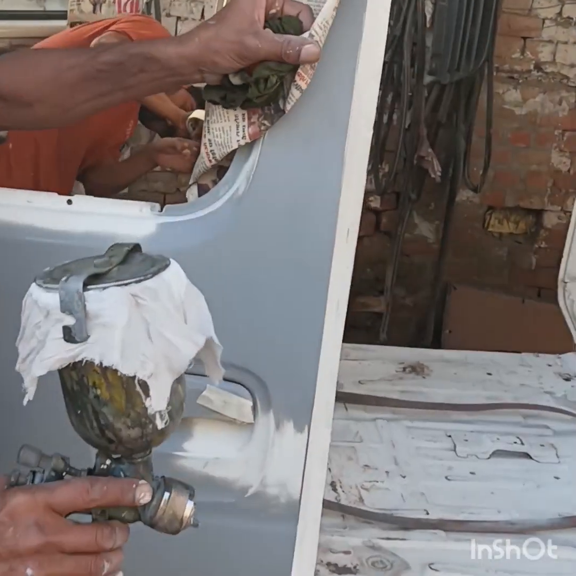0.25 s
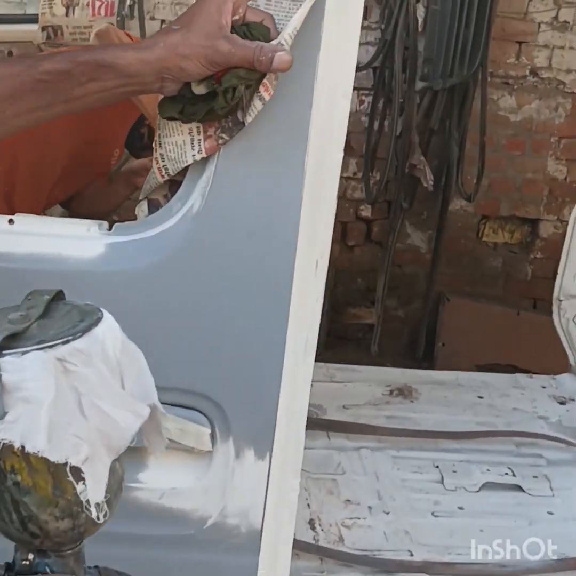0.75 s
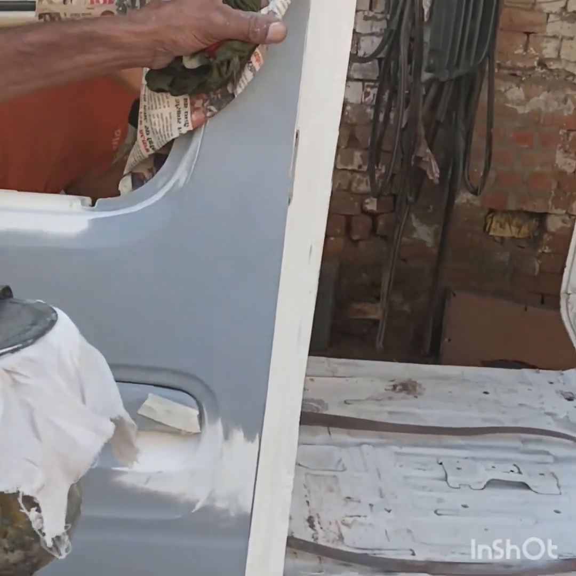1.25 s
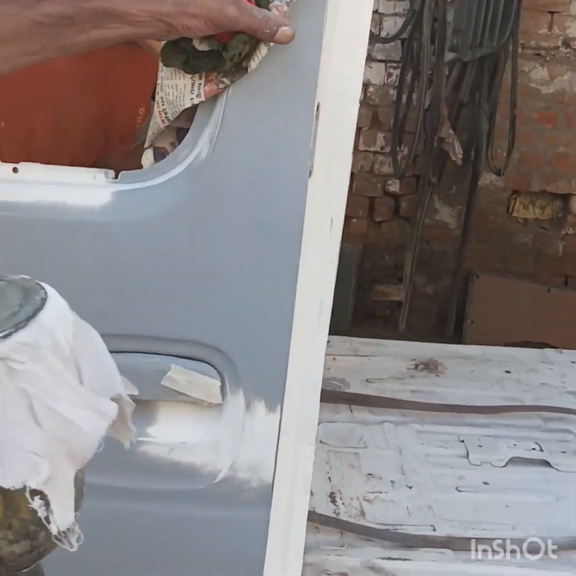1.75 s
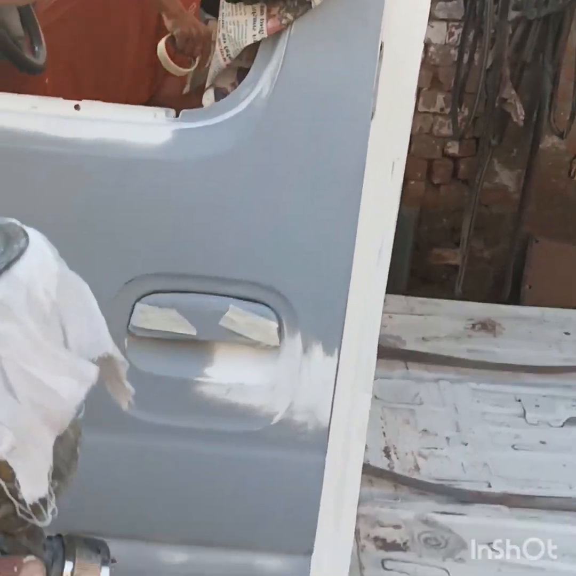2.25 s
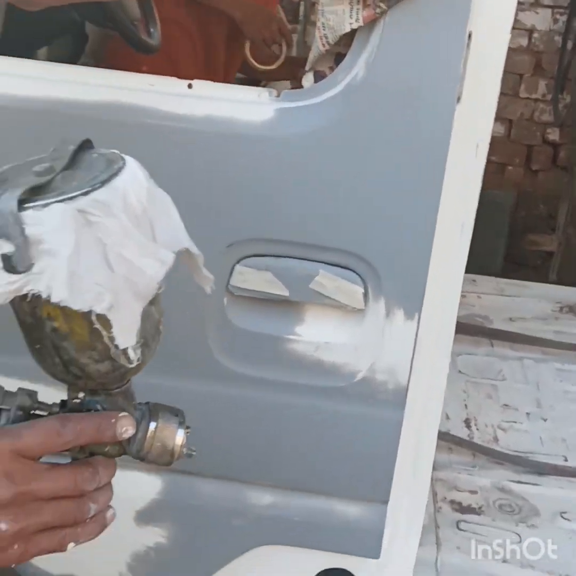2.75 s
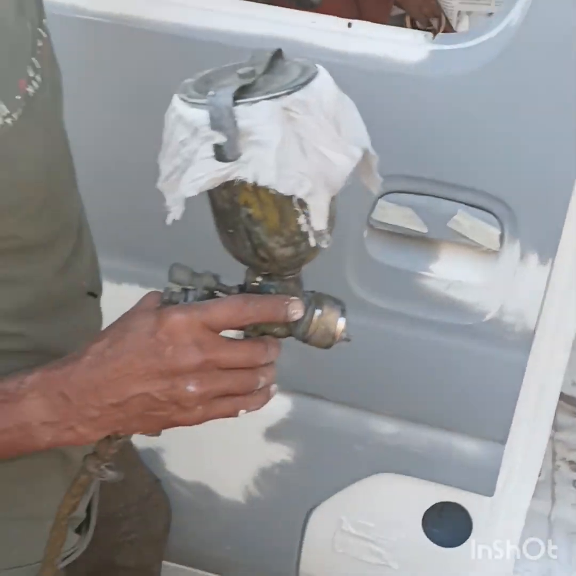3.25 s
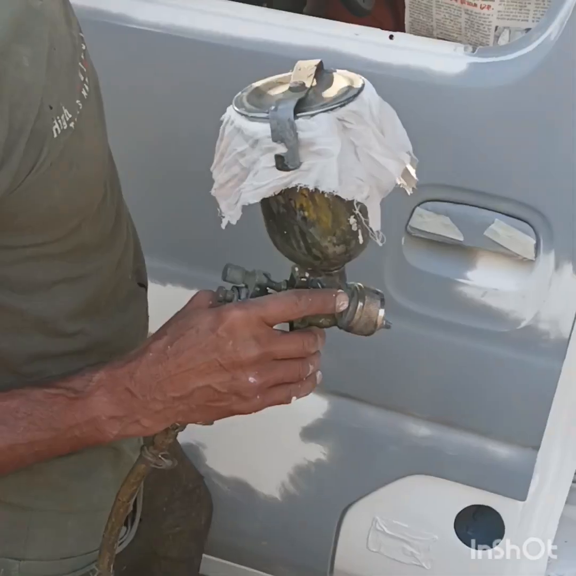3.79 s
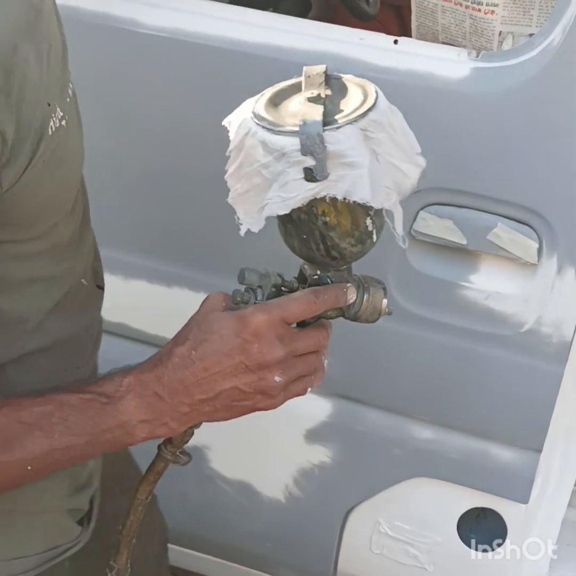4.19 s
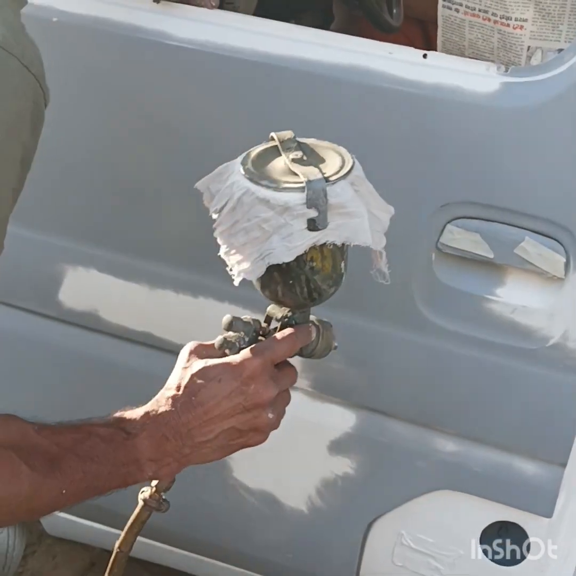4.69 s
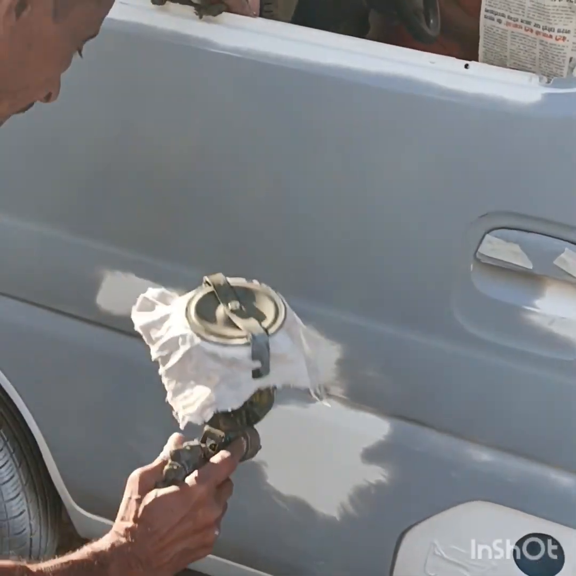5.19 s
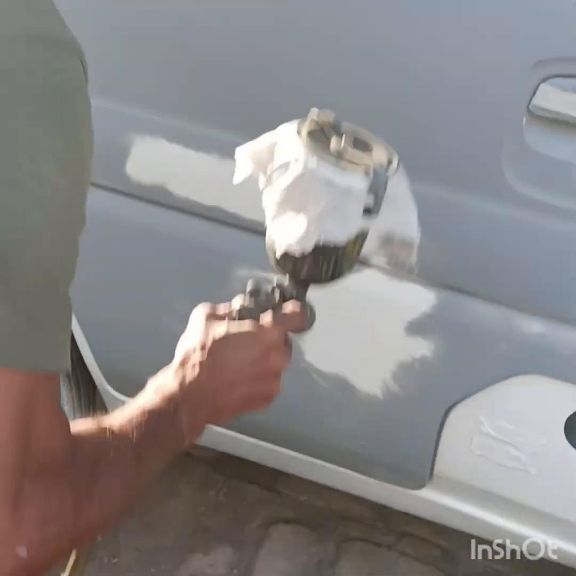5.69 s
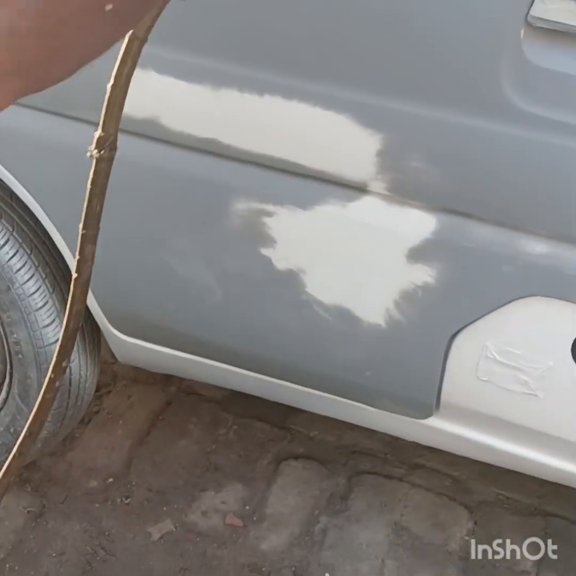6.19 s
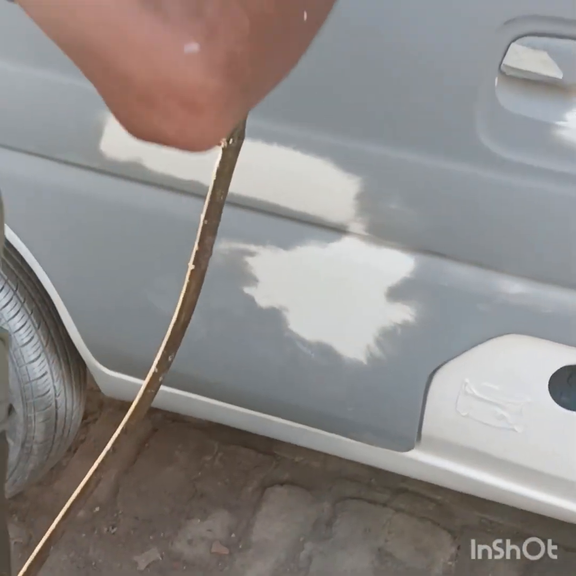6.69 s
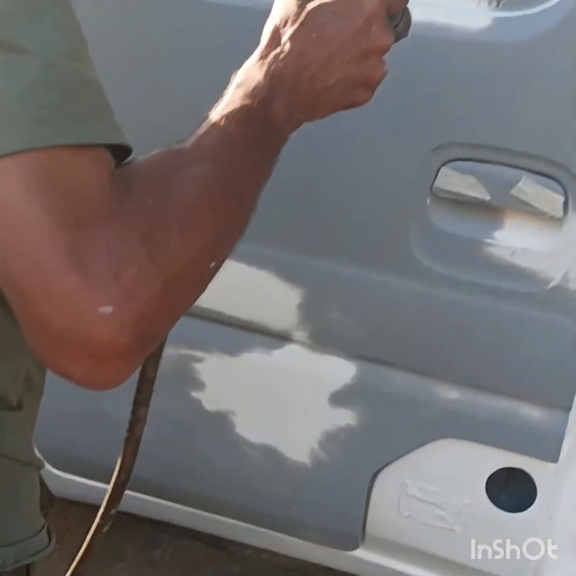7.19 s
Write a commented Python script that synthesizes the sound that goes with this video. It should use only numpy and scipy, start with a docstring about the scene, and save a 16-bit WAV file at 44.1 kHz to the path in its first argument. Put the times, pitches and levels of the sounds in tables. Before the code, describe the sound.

In an open yard, a one-cylinder air compressor chugs without pause, about seven short, low, hollow whoops a second, each with a faint metallic valve clack. A bright, airy spray-gun hiss runs throughout, changing colour and leaning left or right as the gun moves. Faint metal hums come and go; a tiny hoot and a thin whistle pass midway. Stereo microphone close by, compressor stronger on the left, low rumble behind.

```python
"""A one-cylinder piston compressor chugs in an open yard while air hisses from a spray gun near a car door.
Each turn, a sine rising in pitch makes the intake's short hollow whoop, with noise for its rasp and push;
clicks through ringing modes make the discharge valve clack and bounce. The hiss is banded noise whose colour
and stereo lean follow curves, with a nozzle tone; narrow noise swells briefly near 15 kHz. Wavering sines and
narrow noise make faint metal hums, one thin whistle and one soft hoot; banded noise makes the yard floor."""
import sys
import numpy as np
from scipy import signal
from scipy.fft import rfft, irfft
from scipy.io import wavfile
from scipy.ndimage import map_coordinates

SR = 44100
rng = np.random.default_rng(int(sys.argv[2]) if len(sys.argv) > 2 else 0)


def put_to_file(sound):
    """Save the sound as 16-bit audio at rate SR, in the file named by the first command-line argument."""
    columns = np.atleast_2d(sound).T  # one column per channel
    safe = np.clip(columns, -1, 1)
    whole_steps = np.round(safe * 32767)
    wavfile.write(sys.argv[1], SR, whole_steps.astype(np.int16))


N = 328104
TIME = np.arange(N) / SR
HZ = np.maximum(np.arange(N // 2 + 1) * SR / N, 1)

# crank turns, levels relative within the compressor:
# discharge valve/dB, intake whoop peak/dB, rasp/dB, guard shake/dB
TURNS = [(-44, -31, -52, -53), (-53, -31.5, -48, -61), (-44, -27, -51, -61), (-49, -30.5, -53, -66),
         (-46, -31.5, -50, -68), (-45, -31, -48, -64), (-46, -30, -51, -62), (-43, -32.5, -52, -63),
         (-53, -27.5, -57, -64), (-44, -27.5, -51, -56), (-49, -31, -54, -62), (-49, -33.5, -54, -54),
         (-47, -29, -50, -66), (-47, -32, -48, -53), (-47, -26, -52, -62), (-51, -34, -55, -66),
         (-51, -30, -54, -64), (-48, -32, -48, -58), (-48, -29, -51, -60), (-47, -33, -52, -60),
         (-55, -30.5, -55, -52), (-48, -30, -56, -59), (-48, -30.5, -55, -71), (-48, -33.5, -58, -54),
         (-50, -30.5, -55, -62), (-51, -31.5, -54, -66), (-50, -28.5, -56, -60), (-49, -30, -51, -58),
         (-51, -29.5, -57, -68), (-47, -32, -51, -62), (-49, -30.5, -59, -61), (-47, -28.5, -49, -61),
         (-50, -29.5, -58, -61), (-42, -24, -46, -53), (-44, -30.5, -51, -74), (-51, -31, -52, -61),
         (-48, -28.5, -54, -61), (-48, -28.5, -55, -67), (-47, -32.5, -55, -69), (-48, -28, -50, -46),
         (-52, -27.5, -55, -60), (-53, -25, -52, -71), (-51, -31, -58, -72), (-54, -24.5, -50, -67),
         (-53, -31.5, -57, -66), (-50, -29.5, -56, -73), (-53, -29.5, -58, -74), (-50, -31, -63, -69),
         (-45, -28, -50, -61), (-48, -30.5, -57, -53), (-49, -28, -53, -64), (-47, -27.5, -46, -52),
         (-48, -32, -54, -58), (-51, -32, -57, -62), (-47, -30, -53, -62)]
FIRST_VALVE_S, TURN_S = .009, .13722
VALVE_S = FIRST_VALVE_S + TURN_S * np.arange(len(TURNS))


def from_db(db):
    """Amplitude ratio of a level in dB."""
    return 10 ** (np.asarray(db) / 20)


def rms_one(x):
    """Scale to rms 1 over all samples and channels."""
    return x / np.sqrt(np.mean(x ** 2) + 1e-20)


def in_time(rows):
    """Columns of a curve table at every sample."""
    t_s, *columns = np.transpose(rows)
    return [np.interp(TIME, t_s, c) for c in columns]


def at_hz(rows, hz):
    """Columns of a spectrum table at the given frequencies, interpolated over log f."""
    f_hz, *columns = np.transpose(rows)
    return [np.interp(np.log(hz), np.log(f_hz), c) for c in columns]


def drift(rate_hz):
    """Slow random signal, rms 1: noise at SR / 40 through a double pole."""
    r = np.exp(-80 * np.pi * rate_hz / SR)
    noise = rng.standard_normal(N // 40 + 2002)
    slow = signal.lfilter([1], [1, -2 * r, r * r], noise)[2000:]   # drop the start-up
    return np.interp(np.arange(N) / 40, np.arange(len(slow)), rms_one(slow))


def resonance(x, hz, width_hz):
    """Two-pole resonance, gain 1 on top."""
    r = np.exp(-np.pi * width_hz / SR)
    poles = [1, -2 * r * np.cos(2 * np.pi * hz / SR), r * r]
    return signal.lfilter(np.array([1, 0, -1]) * (1 - r * r) / 2, poles, x)


def narrow_noise(hz, width_hz):
    """Noise twice through one resonance; rms 1."""
    once = resonance(rng.standard_normal(N), hz, width_hz)
    return rms_one(resonance(once, hz, width_hz))


def wavering(hz, wobble_hz, flutter_db, rate_hz):
    """Sine whose pitch and level drift; rms 1 at zero flutter."""
    phase = 2 * np.pi * np.cumsum(hz + wobble_hz * drift(rate_hz)) / SR
    return np.sqrt(2) * from_db(flutter_db * drift(rate_hz)) * np.sin(phase)


def swells(rows, width_s):
    """Gain: sum of Gaussian bells at (t/s, peak/dB)."""
    coarse_s = TIME[::40]
    bells = [from_db(db) * np.exp(-.5 * ((coarse_s - t) / width_s) ** 2) for t, db in rows]
    return np.interp(TIME, coarse_s, sum(bells))


def later(x, ms):
    """Delay that may change with time."""
    return map_coordinates(x, [np.arange(N) - ms * SR / 1000], order=3, mode="wrap")


def per_stroke(times_s, levels_db, shape):
    """Gain that repeats one envelope at every stroke; also each sample's stroke index."""
    handover_s = (times_s[1:] + times_s[:-1]) / 2 + .014
    stroke = np.searchsorted(handover_s, TIME)
    t_s, shape_db = np.transpose(shape)[:2]
    envelope_db = np.interp(TIME - times_s[stroke], t_s, shape_db, -90, -90)
    return from_db(levels_db[stroke] + envelope_db), stroke


def bands(edges_hz, spectrum, patchy_db, shared):
    """Yields centre, flicker in dB and three unrelated noises (shared, left, right) for each band."""
    white = (rfft(rng.standard_normal((3, N))) * spectrum).astype(np.complex64)
    together = drift(5.8)
    for centre, above in zip(edges_hz, edges_hz[1:]):
        # overlapping slopes: powers of neighbours sum to 1
        share = np.clip(1 - abs(np.log(HZ / centre)) / np.log(above / centre), 0, 1) ** .5
        flicker_db = patchy_db * (shared * together + drift(14))
        yield centre, flicker_db, irfft(white * share.astype(np.float32), N)


def yard():
    """Motor, belt and street blend into a steady floor of partly shared banded noise."""
    # floor: f/Hz, density/dB (relative), L-R/dB, left-right likeness (0-1)
    floor_rows = [(30, -24, 3.5, .55), (60, -8.5, 1, 0.72), (130, -5.5, -1, 0.8), (257, -6, 4.5, 0.26),
                  (365, -9, 0, 0.6), (770, -7, 5, 0.24), (1050, -9.5, 6, 0.16), (1290, -11.5, 16, 0.13),
                  (1530, -5.5, 5.5, 0.066), (1810, -10, 1, .15), (2200, -8.5, 6, 0.11),
                  (2970, -19, -6, 0.21), (3950, -47, -5, .15)]
    rms_db = -48
    spectrum = from_db(at_hz(floor_rows, HZ)[0]) * (HZ > 20) * (HZ < 5000)
    out = np.zeros((2, N))
    for hz, flicker_db, (both, left, right) in bands(
            np.geomspace(25, 6000, 17), spectrum, patchy_db=3.0, shared=0.31):
        pan_db, alike = at_hz(floor_rows, hz)[1:]
        alike = np.clip(alike, 0, 1)
        common = np.array([np.roll(both, 38), both])   # left lags by 38 samples
        mix = np.sqrt(alike) * common + np.sqrt(1 - alike) * np.array([left, right])
        out += from_db(flicker_db) * from_db(pan_db * np.array([[.5], [-.5]])) * mix
    return from_db(rms_db) * rms_one(out)


def high_swells():
    """Short swells of very high hiss near 15 kHz: bell-gated narrow noise."""
    # swells: t/s, peak of the rms envelope/dB, L-R/dB
    swell_rows = [(.401, -50, -3.5), (.555, -52, -5.5), (.846, -48, -6), (1.433, -46, -6),
                  (3.697, -52, -3.5), (4.101, -51, -3), (4.554, -51, -3), (4.808, -52, -8),
                  (4.968, -47, -12), (5.162, -40, -9.5), (5.526, -50, -3), (6.246, -50, -.5),
                  (6.833, -45, 7), (7.135, -51, -4.5)]
    width_s = .011
    t_s, level_db, pan_db = np.transpose(swell_rows)
    left, right = (swells(zip(t_s, level_db + side * pan_db), width_s) for side in (.5, -.5))
    return np.array([left * narrow_noise(14800, 900), right * narrow_noise(15200, 900)])


def zone_blend(hz, zones_hz, curves):
    """Time curves of frequency zones, interpolated over log f to one band."""
    weights = [np.interp(np.log(hz), np.log(zones_hz), row) for row in np.eye(len(zones_hz))]
    return sum(w * c for w, c in zip(weights, curves))


def jet():
    """Turbulent air at the nozzle: noise shared by both sides, blurred by each side's own, plus an edge tone."""
    # gun movement, only swings about the mean count:
    # t/s, middle hiss level/dB, low, bright and top hiss above it/dB
    moves = [(0, -45, -6, -4.5, -11), (.6, -43, -8, -6, -9.5), (1.2, -42, -8, -6, -10.5),
             (2.5, -42.5, -7, -4.5, -9.5), (3.25, -44.5, -7.5, -4.5, -10.5), (4.3, -44, -8, -5, -8.5),
             (4.74, -41, -12, -6, -9), (4.9, -43.5, -11, -3.5, -7), (5.08, -42, -12, -4.5, -11),
             (5.37, -40, -12, -5, -9), (5.53, -42.5, -12, -1.5, -9), (5.8, -41.5, -11, -6, -8),
             (6, -43, -9, -1, -10), (6.13, -41.5, -8, -2, -10.5), (6.27, -40.5, -11, -6, -13),
             (6.46, -42.5, -9, -2.5, -12.5), (7.1, -44, -9, -2.5, -12.5), (7.44, -45, -8, -1.5, -13)]
    # centres of low, middle, bright and top hiss: f/Hz
    level_zones_hz = [4200, 6700, 10000, 15000]
    # hiss colour: f/Hz, density/dB (relative)
    colour = [(1530, -47), (2600, -13), (3050, -9.5), (3500, -10.5), (4250, -8.3), (5340, -6.5), (5890, -3),
              (6860, 0), (7980, -4.5), (9150, -4.5), (13200, -20), (13600, -20), (14500, -12), (15100, -3),
              (15900, -17)]
    # delay of the left side: t/s, lag/ms
    left_lag = [(0, .95), (.75, 1.02), (2, 1.0), (2.8, .95), (3.3, .88), (5.6, .88), (6.15, .7), (6.6, .71),
                (7.44, .82)]
    # lean as the gun turns: t/s, then L-R/dB in each of the side zones
    sides = [(0.0, 2.0, 6.5, -0.5, 2.0, 2.0, 2.5, -1.0), (1.16, -0.5, 2.5, 2.0, -2.0, 2.5, 0.0, -5.0),
             (4.23, 4.5, 7.5, 1.0, 7.5, 1.0, 2.5, -0.5), (4.91, 1.0, 3.0, 1.0, 3.5, -0.5, 1.5, -8.0),
             (5.64, 1.5, 3.5, 2.5, 5.0, 2.5, 0.5, 0.5), (5.74, 1.5, 7.0, -3.0, 5.0, -1.5, 2.0, -8.5),
             (5.88, 1.0, 3.5, 0.5, 0.5, 2.5, 1.5, 0.5), (6.65, 4.0, 2.0, 0.5, -1.5, -5.0, 1.5, 1.0),
             (6.98, 2.5, 0.5, -0.5, 2.0, -4.5, 2.5, 1.0), (7.44, 3.0, 1.0, -1.0, -0.5, -6.0, 1.5, -5.5)]
    # side zone centres: f/Hz
    side_zones_hz = [2900, 3700, 4500, 5500, 7000, 9300, 15000]
    # likeness of the sides: f/Hz, likeness (0-1)
    likeness = [(2800, .72), (3600, .62), (4800, .44), (15000, .41)]
    # nozzle edge tone flares: t/s, f/Hz, level/dB
    flare_rows = [(1.16, 5960, -44), (1.7, 6050, -48), (2.18, 5970, -46), (3.2, 5900, -52),
                  (3.42, 5990, -51), (6.2, 6240, -43)]
    hiss_rms_db, tone_floor_db, flare_s = -36, -69, .06

    middle, low, bright, top = in_time(moves)
    levels_db = (middle + low, middle, middle + bright, middle + top)
    swings_db = [db - db.mean() for db in levels_db]
    pans_db, lag_ms = in_time(sides), in_time(left_lag)[0]
    spectrum = from_db(at_hz(colour, HZ)[0])
    shared, own = np.zeros((2, N)), np.zeros((2, N))
    for hz, flicker_db, (both, left, right) in bands(
            np.geomspace(2200, 19000, 19), spectrum, patchy_db=1.3, shared=.1):
        level_db = flicker_db + zone_blend(hz, level_zones_hz, swings_db)
        pan_db = zone_blend(hz, side_zones_hz, pans_db)
        gain = from_db(level_db + pan_db * [[.5], [-.5]])
        alike = np.clip(at_hz(likeness, hz)[0], 0, 1)
        shared = shared + np.sqrt(alike) * gain * both
        own = own + np.sqrt(1 - alike) * gain * [left, right]
    shared[0] = later(shared[0], lag_ms)
    hiss = from_db(hiss_rms_db) * rms_one(shared + own)

    flares = from_db(tone_floor_db) + swells(np.array(flare_rows)[:, ::2], flare_s)
    tone = flares * wavering(in_time(flare_rows)[0], wobble_hz=35, flutter_db=4.5, rate_hz=20)
    return hiss + [later(tone, lag_ms), tone]


def during(rows):
    """Gate open between the first and last row of a curve table."""
    return (TIME > rows[0][0]) & (TIME < rows[-1][0])


def thin_tones():
    """Faint metal hums that swell, one thin whistle and one hoot: wavering sines and narrow noise."""
    # brief swells of the lower hum: t/s, level/dB
    lower_swells = [(.19, -44), (.3, -42), (.76, -54), (1.95, -49), (2.47, -49), (2.52, -50), (2.57, -48),
                    (2.65, -54), (4.12, -55), (4.48, -52), (5.06, -48), (5.2, -55), (5.51, -50),
                    (7.43, -52)]
    # brief swells of the upper hum: t/s, level/dB
    upper_swells = [(.2, -48), (1.03, -55), (1.9, -57), (2.24, -47), (4.62, -51), (4.78, -46), (5.2, -55),
                    (5.62, -47), (6.63, -53), (6.9, -50)]
    # whistle: t/s, f/Hz, level/dB
    whistle_rows = [(3.72, 3340, -59), (3.75, 3360, -40), (3.88, 3375, -54), (3.93, 3360, -40),
                    (4.04, 3430, -44), (4.08, 3370, -52), (4.16, 3340, -43), (4.24, 3380, -49),
                    (4.46, 3400, -57)]
    # hoot: t/s, f/Hz, level/dB
    hoot_rows = [(2.53, 570, -58), (2.56, 620, -42), (2.6, 625, -41), (2.66, 625, -48), (2.73, 700, -46),
                 (2.79, 710, -60)]
    hum_floor_db, hum_waver_db, hum_swell_s = -65, 5, .022

    lower, upper = (from_db(hum_floor_db + hum_waver_db * drift(6)) + swells(rows, hum_swell_s)
                    for rows in (lower_swells, upper_swells))
    hum = lower * wavering(1527, wobble_hz=7, flutter_db=2, rate_hz=20)
    hum = hum + upper * narrow_noise(1655, width_hz=40)

    whistle_hz, whistle_db = in_time(whistle_rows)
    line = wavering(whistle_hz, wobble_hz=22, flutter_db=4.5, rate_hz=47)
    side_noise = from_db(3 * drift(15) - 4) * narrow_noise(3490, width_hz=60)
    whistle = from_db(whistle_db) * (line + side_noise)

    hoot_hz, hoot_db = in_time(hoot_rows)
    hoot = from_db(hoot_db) * wavering(hoot_hz, wobble_hz=3, flutter_db=1.2, rate_hz=16.5)
    return hum + during(whistle_rows) * whistle + during(hoot_rows) * hoot


def valve():
    """The discharge valve plate lands, bounces unevenly and rings: clicks into decaying modes."""
    # bounces: t after opening/s, level/dB (relative)
    bounces = [(0, 1), (.01, 1), (.019, -3), (.03, -4), (.042, -8), (.06, -10)]
    # plate modes: f/Hz, level/dB (relative), t60/s
    modes = [(1930, -8, .07), (2090, -6, .07), (2180, -2, .07), (2228, -1, .09), (2295, -1, .09),
             (2345, -3, .07), (2445, -6, .07), (2530, -9, .06)]
    time_spread_s, level_spread_db = 0.0019, 3.7

    turn_db = np.transpose(TURNS)[0]
    after_s, bounce_db = np.transpose(bounces)
    chance = rng.standard_normal((len(VALVE_S), len(after_s), 1 + len(modes)))
    hit_s = VALVE_S[:, None] + after_s + time_spread_s * chance[..., 0]
    at = np.clip((hit_s * SR).astype(int), 0, N - 1)
    out = np.zeros(N)
    for k, (hz, mode_db, t60_s) in enumerate(modes):
        clicks = np.full(N, 1e-18)   # keeps the filter out of denormals
        clicks[at] = from_db(turn_db[:, None] + bounce_db + mode_db + level_spread_db * chance[..., k + 1])
        r, w = from_db(-60 / (t60_s * SR)), 2 * np.pi * hz / SR
        ring = signal.lfilter([0, np.sin(w)], [1, -2 * r * np.cos(w), r * r], clicks)
        out += ring * (-1) ** k
    return out


def intake():
    """The air column in the intake pipe swells and rises in pitch; the rush of air shakes housing and guard."""
    # one whoop: t from peak/s, level/dB (relative), pitch ratio
    whoop_shape = [(-.042, -36, .95), (-.032, -20, .93), (-.018, -12, .94), (-.006, -2, .98), (0, 0, 1.01),
                   (.007, -2, 1.04), (.013, -11, 1.07), (.018, -36, 1.08)]
    # swell after it: t from peak/s, level/dB (relative)
    after_shape = [(.012, -30), (.018, -6), (.025, 2), (.036, -1.5), (.05, -9), (.066, -24)]
    # intake valve opening: t from peak/s, level/dB (relative)
    gulp_shape = [(-.038, -45), (-.026, -1), (-.01, 1), (.015, -1), (.03, -9.5), (.05, -11.5), (.07, -30)]
    # intake housing modes: f/Hz, width/Hz, level/dB (relative)
    housing_modes = [(295, 22, -3), (390, 25, -4), (460, 50, -6), (520, 50, -6), (640, 50, -8),
                     (710, 45, -9), (1060, 50, -12)]
    usual_whoop_db, whoop_after_valve_s = -30, .097
    # a stronger gulp peaks later and lower
    later_s_per_db, lower_hz_per_db = .0012, 1.5
    whoop_hz, creep_hz_per_s, whoop_spread_hz = 208.5, .8, 2
    after_below_db, after_spread_db = 15, 3.5
    push_usual_db, push_db_per_db, push_spread_db = -56, 1.1, 4
    guard_hz, guard_width_hz, guard_ahead_s = 807, 12.7, 0.034

    whoop_db, rasp_db, guard_db = np.transpose(TURNS)[1:]
    effort_db = whoop_db - usual_whoop_db
    peak_s = VALVE_S + whoop_after_valve_s + later_s_per_db * effort_db
    chance = rng.standard_normal((len(peak_s), 4 + len(housing_modes)))

    hz = whoop_hz + creep_hz_per_s * peak_s - lower_hz_per_db * effort_db + whoop_spread_hz * chance[:, 1]
    gain, stroke = per_stroke(peak_s, whoop_db, whoop_shape)
    ratio = np.interp(TIME - peak_s[stroke], *np.transpose(whoop_shape)[::2])
    phase = 2 * np.pi * np.cumsum(hz[stroke] * ratio) / SR
    whoop = gain * (np.sin(phase) + from_db(-24) * np.sin(2 * phase))

    # the after-swell settles on a pitch of its own
    after_hz = hz * (.93 + 0.0483 * chance[:, 0])
    after_db = whoop_db - after_below_db + after_spread_db * chance[:, 2]
    after_phase = 2 * np.pi * np.cumsum(after_hz[stroke]) / SR
    after = per_stroke(peak_s, after_db, after_shape)[0] * np.sin(after_phase)

    # every gulp shakes the housing modes in other proportions
    housing = sum(from_db(db + 2.76 * spread[stroke]) * narrow_noise(f, width)
                  for (f, width, db), spread in zip(housing_modes, chance.T[4:]))
    pipe_overtone = wavering(582, wobble_hz=14, flutter_db=2, rate_hz=25)
    rasp = per_stroke(peak_s, rasp_db, gulp_shape)[0] * (housing + pipe_overtone)

    shake_gain = per_stroke(peak_s - guard_ahead_s, guard_db, gulp_shape)[0]
    shake = shake_gain * wavering(guard_hz, wobble_hz=8, flutter_db=2, rate_hz=20)
    guard = from_db(8.0) * resonance(shake, guard_hz, guard_width_hz)   # belt guard rings on

    push_db = push_usual_db + push_db_per_db * effort_db + push_spread_db * chance[:, 3]
    push = per_stroke(peak_s + 0.011, push_db, gulp_shape)[0] * narrow_noise(108, width_hz=102)
    return whoop + after + rasp + guard + push


def placed(x, echo_db):
    """The right side is shadowed, the left hears later; walls return a short tail of their own to each side."""
    # compressor side: f/Hz, L-R/dB
    shadow = [(60, 9.5), (150, 1), (300, -0.5), (420, 12), (600, 16.5), (800, 15.5), (1500, 21), (2300, 3),
              (3400, 11)]
    left_lag_ms, t60_s = 0.902, 0.22
    right = irfft(rfft(x) * from_db(-at_hz(shadow, HZ)[0]), N)
    direct = np.array([later(x, left_lag_ms), right])
    t_s = TIME[:SR // 2]
    tail = rng.standard_normal((2, len(t_s))) * from_db(-60 * t_s / t60_s) * (t_s > .006)
    tail = from_db(echo_db) * tail / np.sqrt(np.sum(tail ** 2, axis=1, keepdims=True))
    return direct + signal.fftconvolve(direct, tail, axes=1)[:, :N]


def scene():
    """Compressor, gun, high swells and yard."""
    bass = placed(from_db(4.0) * intake(), echo_db=-26)
    metal = placed(from_db(.4) * valve() + thin_tones(), echo_db=-10.5)
    return bass + metal + jet() + high_swells() + yard()


def record(dry):
    """The microphone loses the deepest bass; the top is cut steeply."""
    low_cut_hz, top_cut_hz = 42, 15740
    dry = signal.sosfilt(signal.butter(2, low_cut_hz, "high", fs=SR, output="sos"), dry)
    return signal.sosfilt(signal.ellip(16, .5, 60, top_cut_hz, fs=SR, output="sos"), dry)


dry = scene()
out = record(dry)
put_to_file(out)
```